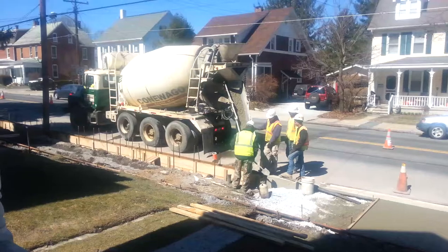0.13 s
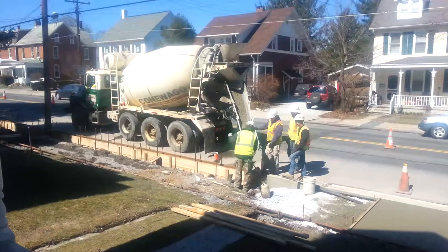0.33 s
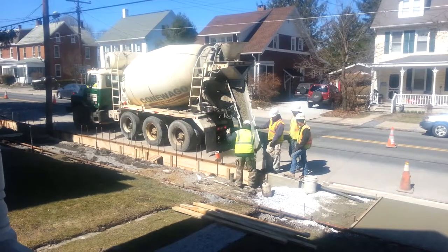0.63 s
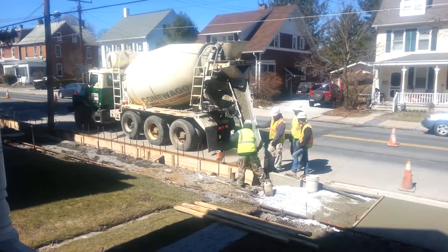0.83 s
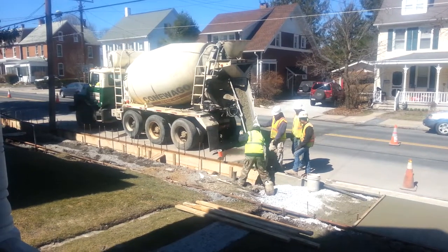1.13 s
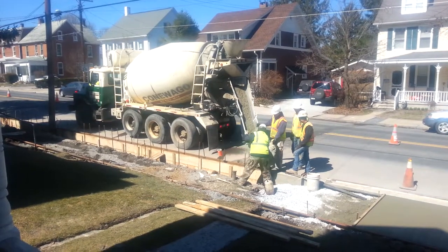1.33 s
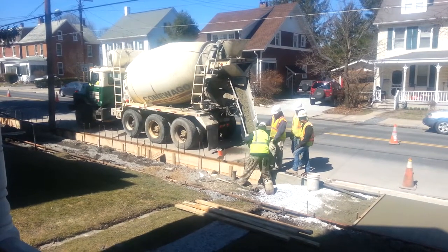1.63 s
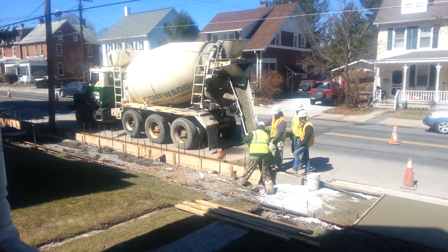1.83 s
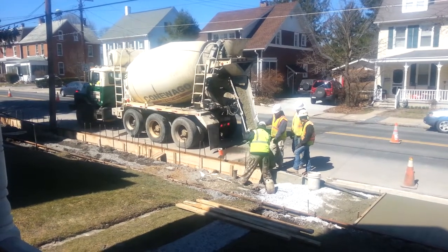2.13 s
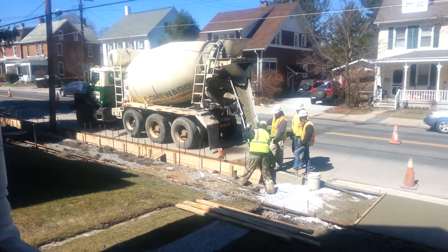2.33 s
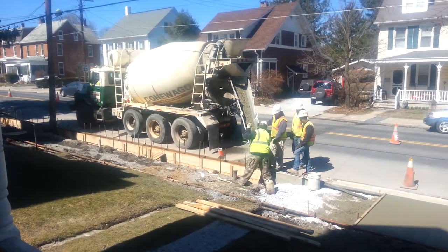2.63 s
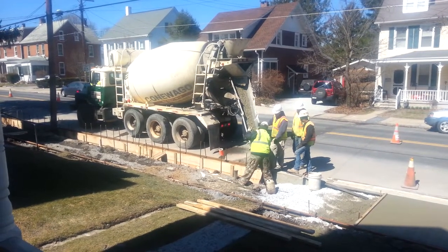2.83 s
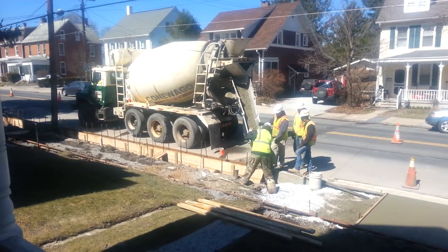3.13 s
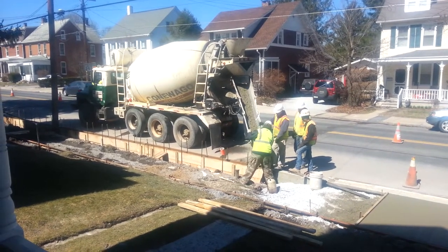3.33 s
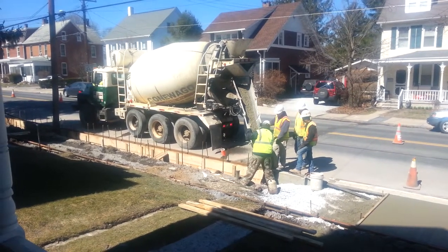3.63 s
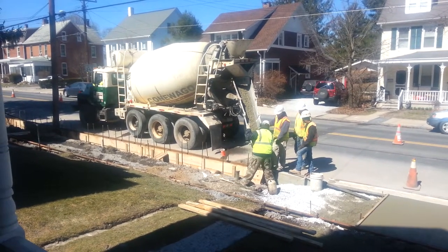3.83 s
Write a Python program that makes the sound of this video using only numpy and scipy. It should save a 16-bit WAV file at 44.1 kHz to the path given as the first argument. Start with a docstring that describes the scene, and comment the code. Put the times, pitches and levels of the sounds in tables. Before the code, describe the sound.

Cement mixer truck engine drones and clatters steadily while wet concrete hisses down the chute

```python
"""Cement mixer at work

A cement mixer truck stands across a street, its six-cylinder diesel at a fast idle to turn the drum.
The engine drones in tones tied to its speed and clatters in noise that swells with each firing; the drum drive whines.
Wet gravelly concrete, made of noise and ticks, hisses down the chute on the right; a shovel scrapes through it.
Rough booms are the load thudding in the drum, faint tones are steel clinking and squealing, low noise is a breeze.
After a moment of silence the sound fades in."""
import sys
import numpy as np
from scipy import signal
from scipy.fft import rfft, irfft
from scipy.io import wavfile

SR = 44100
rng = np.random.default_rng(int(sys.argv[2]) if len(sys.argv) > 2 else 0)


def int16_out(signal):
    """Quantize to a 16-bit WAV file."""
    q = np.round(np.clip(np.atleast_2d(signal).T, -1, 1) * 32767)
    wavfile.write(sys.argv[1], SR, q.astype(np.int16))


N = 176400  # samples: four seconds
TIME = np.arange(N) / SR  # s
BINS = np.fft.rfftfreq(N, 1 / SR)  # Hz

# All levels apply before the opening fade-in, whose last gain holds to the end.
# Spectra give only the shape: their loudness is set elsewhere.

# puffs of breeze on the microphone [start t/s, length t/s, level/dB]
GUSTS = [(.56, 0.31, -38), (.77, 0.11, -42), (2.08, 0.099, -48)]
# spectrum of the breeze [f/Hz, relative level/dB]
BREEZE_SPECTRUM = [(15, -28), (40, -19), (70, 9), (100, 0), (160, -5), (400, -35), (1500, -70)]

# touches on a small piece of steel on the truck [t/s, level/dB]
CLINKS = [(1.613, -30), (1.689, -40)]
CLINK_HZ, CLINK_T60_S = 1810, 0.23  # pitch; seconds to fall by 60 dB

# a brief squeal of the turning drum [start t/s, length t/s, level/dB]
SQUEALS = [(1.98, .48, -46)]
SQUEAL_HZ = 2843

# dull thuds of the load tumbling in the drum [start t/s, length t/s, level/dB, pitch f/Hz]
TUMBLES = [(0.625, 0.058, -41, 170), (0.768, .07, -32, 345), (0.977, 0.11, -32, 315),
           (1.48, 0.08, -34.5, 362), (2.06, .07, -35.5, 175), (2.148, 0.07, -36, 180),
           (2.375, 0.056, -34, 323), (2.725, 0.13, -29, 332), (3.2, 0.064, -33.5, 318),
           (3.36, 0.076, -39, 300), (3.483, 0.048, -33, 320), (3.608, 0.077, -33, 290),
           (3.75, 0.2, -37, 182), (3.816, 0.079, -34, 350)]

# strokes of the shovel [start t/s, length t/s, level/dB]
SCRAPES = [(.87, 0.067, -32), (1.37, 0.08, -31), (1.605, 0.035, -37), (2.12, 0.11, -33),
           (2.63, 0.14, -32.5), (2.85, 0.068, -32), (2.988, .09, -26.5), (3.11, 0.24, -34.5)]
# spectrum of a scrape [f/Hz, relative level/dB]
SCRAPE_SPECTRUM = [(400, -20), (900, 1), (1600, 5), (2500, 2.5), (4500, -5), (8000, -11), (11500, -10),
                   (14000, -29)]

# spectrum of concrete sliding down the chute [f/Hz, relative level/dB]
CHUTE_SPECTRUM = [(500, -24), (1200, -8), (1900, -10.5), (2450, -10.5), (3200, -5), (3950, -1), (4350, -1),
                  (4700, .5), (5200, -5.5), (6300, -14.5), (7800, -13.5), (9800, -17), (11000, -17.5),
                  (13200, -25), (14500, -57)]
# surges of the flow [t/s, change of level/dB]
FLOW = [(.6, 3), (.75, 4), (.82, 1.5), (.93, 3.5), (1.03, 1), (1.2, 3.2), (1.48, 2.5), (1.8, 1.4),
        (2.07, 1.5), (2.28, 3), (2.42, 0.7), (2.7, 2.5), (3.1, 2.5), (3.25, 3), (3.42, 2), (3.6, 2),
        (3.82, 1.5), (4, 1.8)]
# lumps rushing down the chute [start t/s, length t/s, level relative to the flow/dB]
LUMPS = [(3.19, 0.056, -16), (3.295, .05, -9), (3.57, .04, -11)]
CHUTE_DB, CHUTE_LEFT_DB = -28.5, -21.5  # basic level; left side relative to right
STONES_PER_S, STONE_SPREAD_DB = 1400, 4  # average rate; average step up in stone level
STONES_DB = -7.5  # all stones relative to the sliding noise

# whines of the drum drive and pump [f/Hz, level/dB, left minus right/dB]
WHINES = [(95.6, -51, 2), (182, -46, 0.5), (192, -47, -7), (740, -50.5, -5), (911, -47.5, -10.5),
          (945, -51, -6), (1191, -51, -11.5), (1780, -63, -12), (2842, -60, -24), (3956, -59.5, -24),
          (6966, -74, -5)]

CYCLE_HZ, SPEED_DRIFT = 14.5, 0.00082  # four-stroke cycles a second; share by which the speed wanders
# strength of the six firings in a cycle [level/dB]
CYLINDER_DB = [3.5, -6, -9, 2, -4, -5]

# spectrum of the engine and fan roar [f/Hz, relative level/dB]
ROAR_SPECTRUM = [(20, -49), (45, -35), (80, -16), (125, -6.5), (180, -1.5), (250, -2.5), (340, 0.5),
                 (400, -4.5), (480, -1), (560, -5), (660, -4), (800, -3.5), (1050, -7), (1600, -8),
                 (2400, -12.5), (3600, -15.5), (5000, -20.5), (6200, -27.5), (8000, -28.5), (11000, -39.5),
                 (14500, -38)]
# how alike the two ears hear the roar [f/Hz, likeness from 0 to 1]
ROAR_LIKENESS = [(40, 0.81), (150, 0.92), (350, 0.85), (600, 0.62), (880, 0.6), (1100, 0.052), (1700, 0.44),
                 (3000, 0.22), (8000, 0.077)]
# balance of the roar and the weak engine lines [f/Hz, left minus right/dB]
ROAR_PAN = [(40, -5), (150, -2), (300, 0.5), (420, -3), (510, -4), (680, -1.5), (1200, -2.5), (2500, -3.5),
            (8000, -9.5)]
ROAR_DB, KNOCK_DEPTH, KNOCK_DECAY_S = -28.5, 0.29, 0.0036  # level; swell at a 0 dB firing; its decay time

# strong engine lines [multiple of the cycle rate, level/dB, left minus right/dB, roughness]
ORDERS = [(4, -66, -3, .3), (5, -60, -7, .3), (9, -45.5, 0, 0.24), (10, -52.5, -8, .4), (12, -49, 0, 0.35),
          (16, -46.5, -6, 0.38), (18, -46.5, -6, 0.3), (19, -51.5, -1, 0.62), (21, -50.5, -12, 0.78),
          (30, -38.5, 8, 0.37), (32, -44, 6, 0.42), (36, -45.5, 6, .6), (42, -34.5, 2.5, 0.27),
          (48, -47.5, -10, 0.45), (54, -42.5, -4, .25)]
# bed of weak engine lines [f/Hz, level of each line/dB]
DRONE = [(40, -85), (110, -67), (190, -52.5), (350, -48), (400, -57.5), (480, -52.5), (600, -54.5),
         (950, -56), (1400, -69)]
# delay of the left ear for sound from the truck [f/Hz, delay t/s]
LAG = [(50, 0.00016), (370, 0.00016), (435, 0.00031), (480, 0.00023), (530, 0.00047), (610, 0.0004),
       (750, 0.00032), (3000, 0.00044)]

# opening fade-in; the last gain holds to the end [t/s, gain/dB]
FADE = [(0.416, -54), (0.43, -27.5), (.475, -18), (.515, -10.5), (.545, -12), (.6, -6.5), (.69, -4.5)]
EDGE_HZ = 14500  # upper limit of the whole sound


def amp(db):
    """Turns decibels into gain."""
    return 10 ** (np.asarray(db) / 20)


def unit(x):
    """Scales a sound to an average strength (rms) of 1."""
    return x / np.sqrt(np.mean(x ** 2) + 1e-20)


def read(points, hz):
    """Reads a table between its points, along a log-frequency axis."""
    f, value = np.transpose(points)
    return np.interp(np.log(hz + 1), np.log(f + 1), value)


def colour(x, spectrum):
    """Filters a sound by a spectrum shape, then scales it to rms 1."""
    return unit(irfft(rfft(x) * amp(read(spectrum, BINS)), N))


def wander(rate_hz):
    """Slow random movement: noise that thins out above a rate, at rms 1."""
    points = 4096
    hz = np.fft.rfftfreq(points, N / SR / points)
    keep = np.exp(-(hz / rate_hz) ** 2) * (hz > 0)
    slow = irfft(rfft(rng.standard_normal(points)) * keep)
    return np.interp(TIME, np.linspace(0, N / SR, points), unit(slow))


def arches(events):
    """A level that rises and falls as half a sine wave, once for each row."""
    level = 0
    for start, length, db in events:
        progress = np.clip((TIME - start) / length, 0, 1)
        level = level + amp(db) * np.sin(np.pi * progress)
    return level


def ears(hz, pan_db):
    """Left and right gains for sound from the truck; the complex left gain also delays it."""
    left = amp(pan_db / 2) * np.exp(-2j * np.pi * hz * read(LAG, hz))
    right = amp(-pan_db / 2)
    return np.array([left, right]).reshape(2, -1)


def tone(turns, hz, db, pan_db, rough, flutter_hz):
    """A tone whose strength and phase flutter at random, which makes it rough."""
    flutter = 1 + rough * (wander(flutter_hz) + 1j * wander(flutter_hz)) / np.sqrt(2)
    steady_level = np.sqrt(2 / (1 + rough ** 2))  # roughness adds no loudness
    line = flutter * np.exp(2j * np.pi * (turns + rng.random())) * steady_level
    return amp(db) * (ears(hz, pan_db) * line).real


def gravel():
    """Gritty sliding: steady noise plus the random ticks of single stones."""
    sizes = amp(STONE_SPREAD_DB * np.minimum(rng.exponential(1, N), 5))
    hits = rng.random(N) < STONES_PER_S / SR
    stones = sizes * rng.choice([-1, 1], N) * hits
    return unit(rng.standard_normal(N) + amp(STONES_DB) * unit(stones))


def breeze(left_db=-7):
    """Air buffets the two microphones separately, as low noise in puffs."""
    noise = colour(rng.standard_normal((2, N)), BREEZE_SPECTRUM)
    return arches(GUSTS) * amp([[left_db], [0]]) * noise


def clink(left_db=-4):
    """Steel rings at one pitch and dies away quickly after each touch."""
    rings = 0
    for start, db in CLINKS:
        age = np.maximum(TIME - start, 0)
        decay = np.exp(-np.log(1000) * age / CLINK_T60_S)
        rings = rings + amp(db) * decay * np.sin(2 * np.pi * CLINK_HZ * age)
    return amp([[left_db], [0]]) * rings


def squeal():
    """Steel rubs on steel: a thin tone swells and dies away."""
    return arches(SQUEALS) * tone(SQUEAL_HZ * TIME, SQUEAL_HZ, 0, pan_db=-18, rough=.7, flutter_hz=25)


def tumbling():
    """Concrete slumps inside the turning drum; each slump booms briefly and roughly in the shell."""
    thuds = 0
    for start, length, db, hz in TUMBLES:
        boom = tone(hz * TIME, hz, 0, pan_db=-2.5, rough=0.72, flutter_hz=35)
        thuds = thuds + arches([(start, length, db)]) * boom
    return thuds


def shovel(left_db=-11):
    """A blade strokes through wet gravel, heard as short bursts of gritty noise."""
    left = amp(left_db) * colour(gravel(), SCRAPE_SPECTRUM)
    right = colour(gravel(), SCRAPE_SPECTRUM)
    return arches(SCRAPES) * np.array([left, right])


def chute():
    """Concrete slides down in uneven surges, heard on the right."""
    t, db = np.transpose(FLOW)
    surges = amp(np.interp(TIME, t, db) + .5 * wander(rate_hz=23))
    flow = surges * (1 + arches(LUMPS))
    left, right = colour(gravel(), CHUTE_SPECTRUM), colour(gravel(), CHUTE_SPECTRUM)
    faint_left = amp(CHUTE_LEFT_DB) * unit(left + .5 * right)  # partly the same sound as the right
    return amp(CHUTE_DB) * flow * np.array([faint_left, right])


def drum_drive(cycles, follow=0.62):
    """Gears and hydraulic pump whine, following part of the engine's wandering speed."""
    clock = TIME + follow * (cycles / CYCLE_HZ - TIME)
    return sum(tone(hz * clock, hz, db, pan, rough=1.0, flutter_hz=4.0) for hz, db, pan in WHINES)


def engine_roar(cycles):
    """Broad noise that swells with each firing, some cylinders harder than others."""
    firings = cycles * len(CYLINDER_DB)
    age = firings % 1 / (CYCLE_HZ * len(CYLINDER_DB))  # seconds since the last firing
    strength = amp(CYLINDER_DB)[firings.astype(int) % len(CYLINDER_DB)]
    knock = strength * np.exp(-age / KNOCK_DECAY_S)
    swell = (1 + KNOCK_DEPTH * knock) * amp(.5 * wander(rate_hz=11.0))
    shared, extra = rfft(rng.standard_normal((2, N)) * swell)
    same = np.clip(read(ROAR_LIKENESS, BINS), 0, 1)
    left = same * shared + np.sqrt(1 - same ** 2) * extra
    pair = np.array([left, shared]) * ears(BINS, read(ROAR_PAN, BINS))
    return amp(ROAR_DB) * colour(irfft(pair, N), ROAR_SPECTRUM)


def engine_drone(cycles):
    """Multiples of the cycle rate: some strong lines over a bed of weak ones that repeats every cycle."""
    strong = 0
    for order, db, pan, rough in ORDERS:
        k = round(order)
        strong = strong + tone(k * cycles, k * CYCLE_HZ, db, pan, rough, flutter_hz=19)
    k = np.arange(96)
    hz = k * CYCLE_HZ
    unused = ~np.isin(k, [round(row[0]) for row in ORDERS])  # not already a strong line
    weak = amp(read(DRONE, hz)) * (k > 2) * unused
    lines = weak * np.exp(2j * np.pi * rng.random(len(k))) * ears(hz, read(ROAR_PAN, hz))
    size = 8192  # points in one cycle of the bed
    one_cycle = irfft(lines, size) * size / np.sqrt(2)
    place = np.arange(size) / size
    bed = np.array([np.interp(cycles % 1, place, side) for side in one_cycle])
    return strong + bed


def scene():
    """One engine speed drives drone, roar and drum whine; all the other sounds are added beside them."""
    speed = CYCLE_HZ * (1 + SPEED_DRIFT * wander(rate_hz=2.3))
    cycles = np.cumsum(speed) / SR  # engine cycles so far
    small_sounds = breeze() + clink() + squeal() + tumbling()
    concrete = shovel() + chute()
    engine = drum_drive(cycles) + engine_roar(cycles) + engine_drone(cycles)
    return small_sounds + concrete + engine


def record(dry):
    """Silence, a quick fade-in, and a filter that removes the highest treble."""
    t, db = np.transpose(FADE)
    faded = dry * amp(np.interp(TIME, t, db)) * (TIME > t[0])
    low_pass = signal.firwin(511, EDGE_HZ, window=("kaiser", 9), fs=SR)
    return signal.oaconvolve(faded, low_pass[None], "same")


dry = scene()
out = record(dry)
int16_out(out)
```